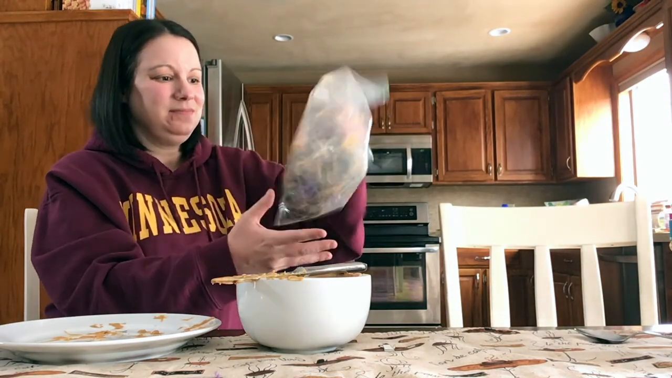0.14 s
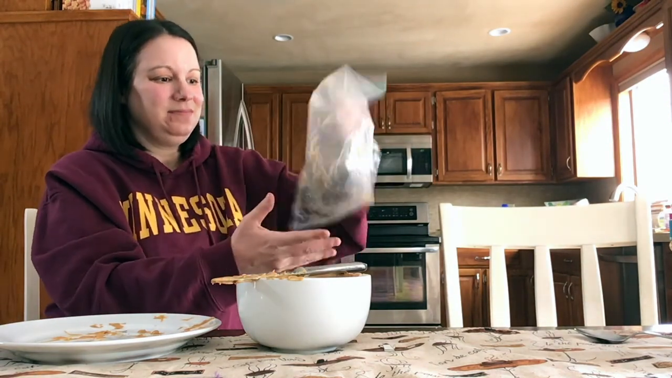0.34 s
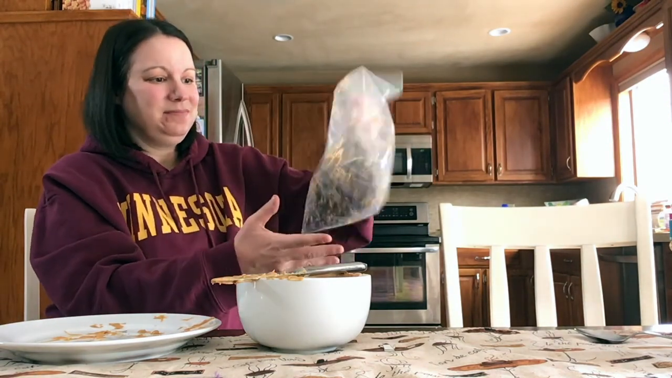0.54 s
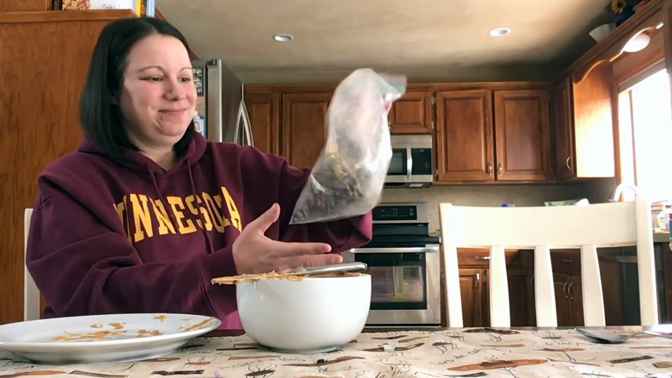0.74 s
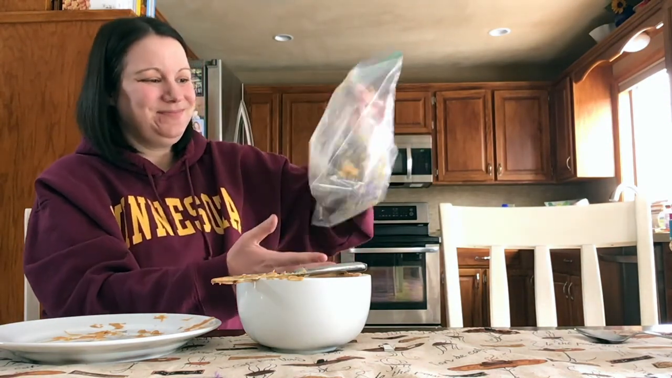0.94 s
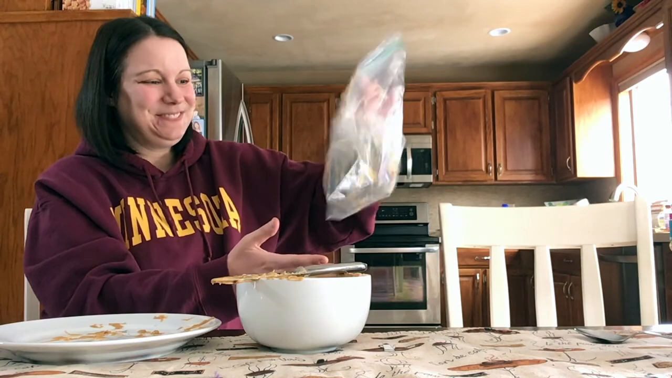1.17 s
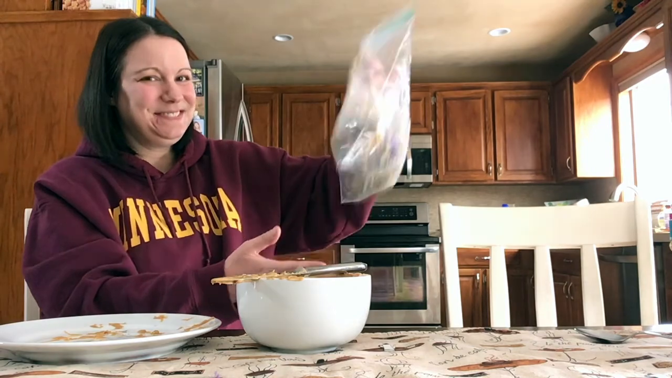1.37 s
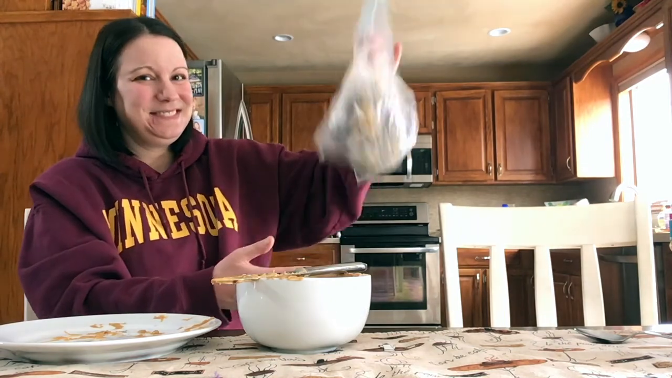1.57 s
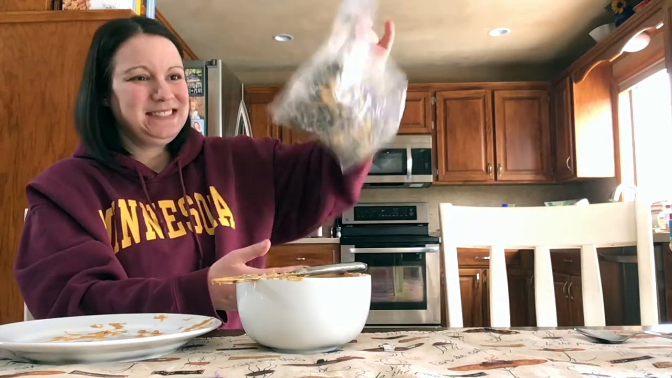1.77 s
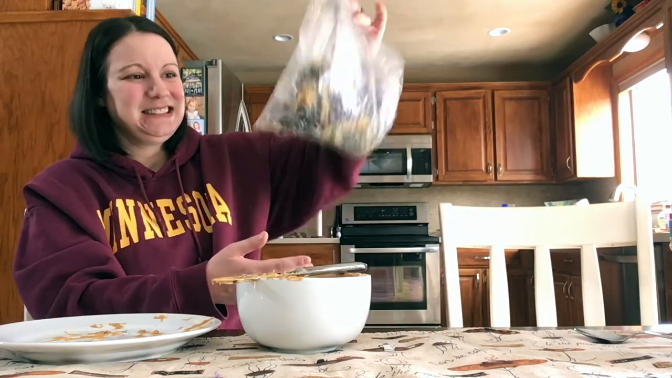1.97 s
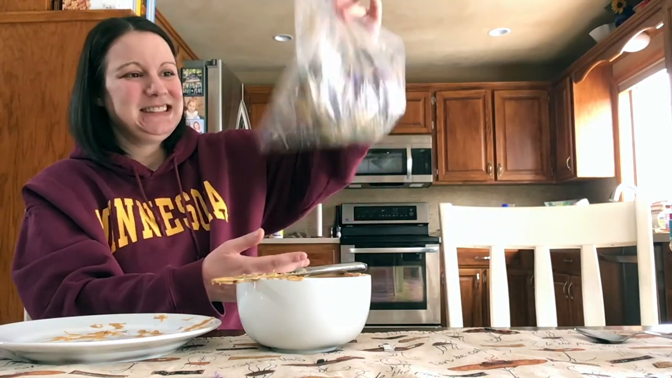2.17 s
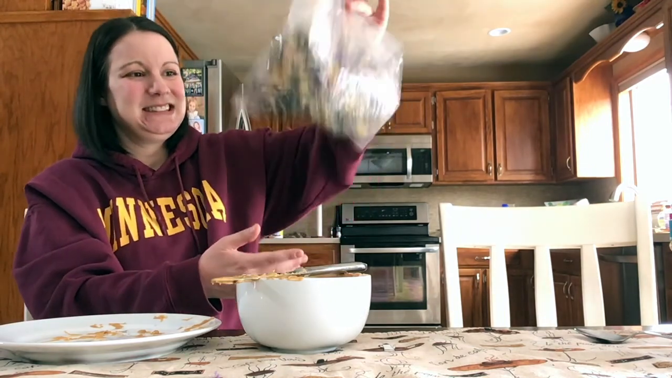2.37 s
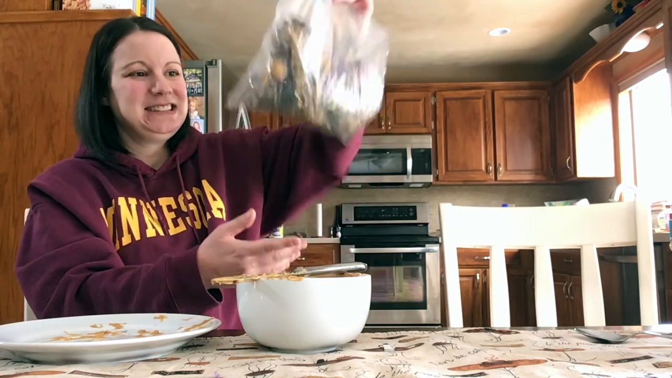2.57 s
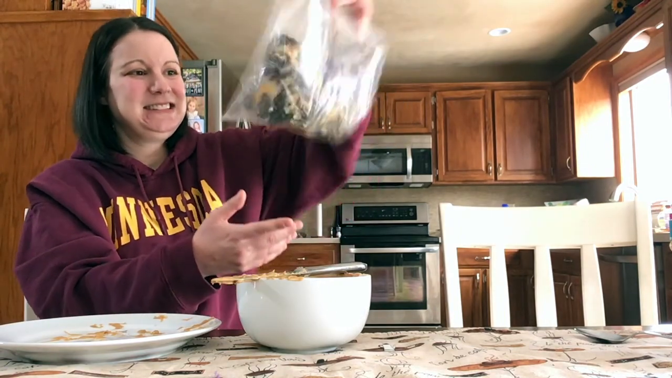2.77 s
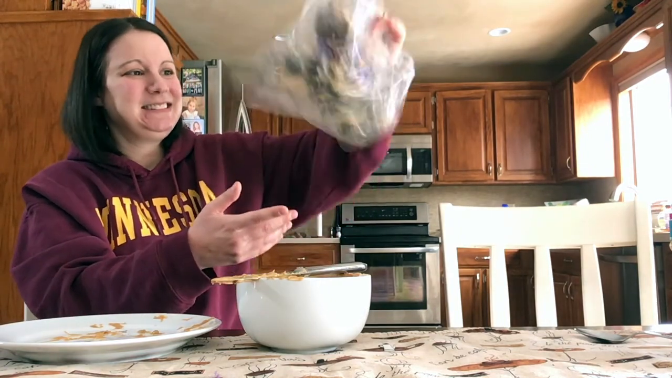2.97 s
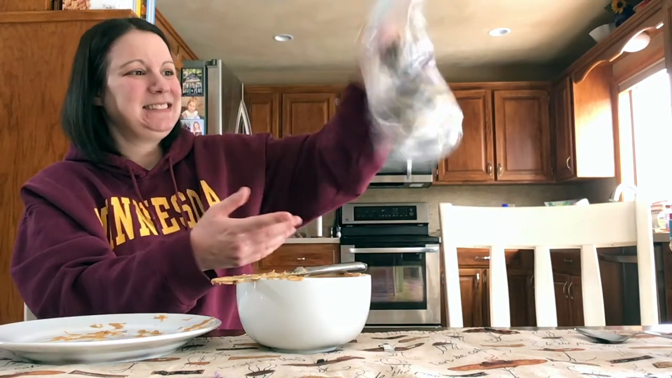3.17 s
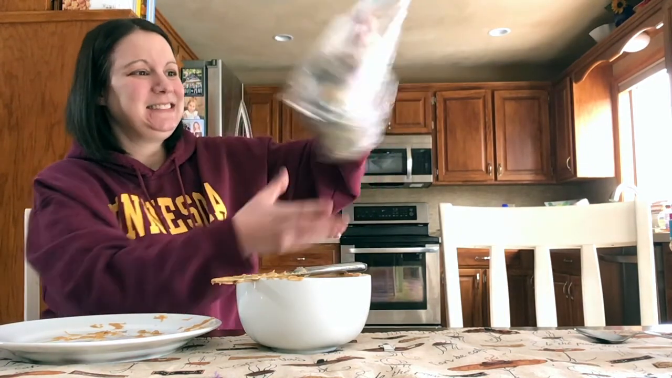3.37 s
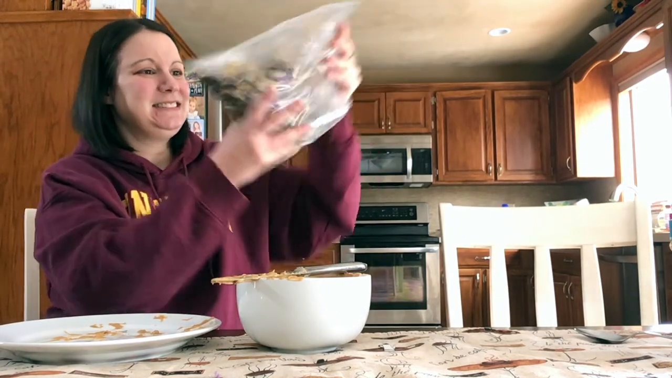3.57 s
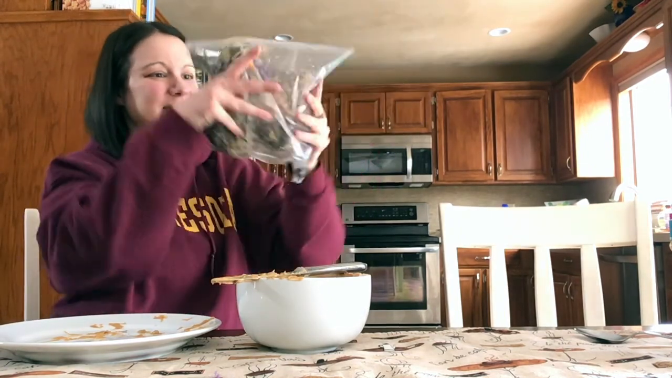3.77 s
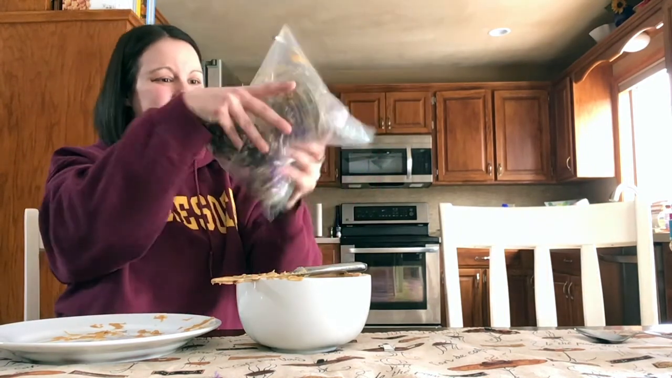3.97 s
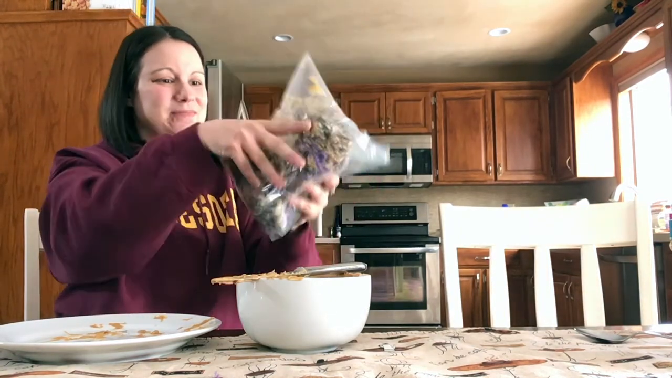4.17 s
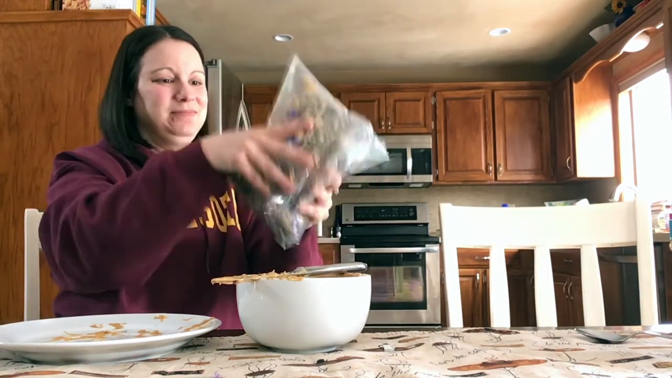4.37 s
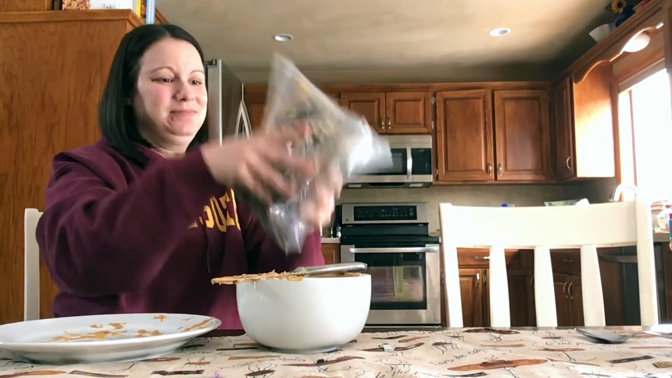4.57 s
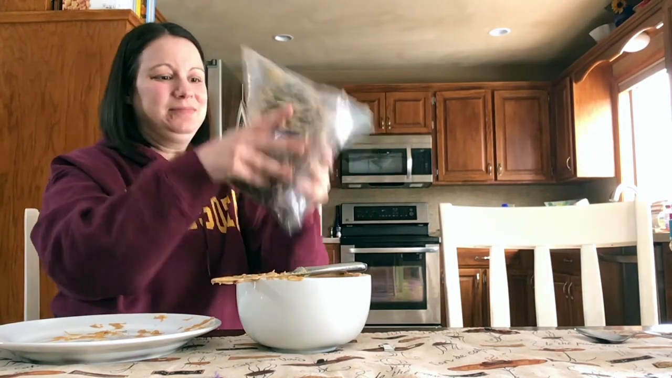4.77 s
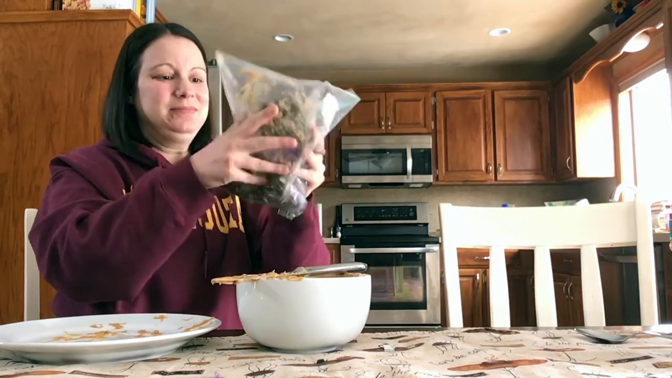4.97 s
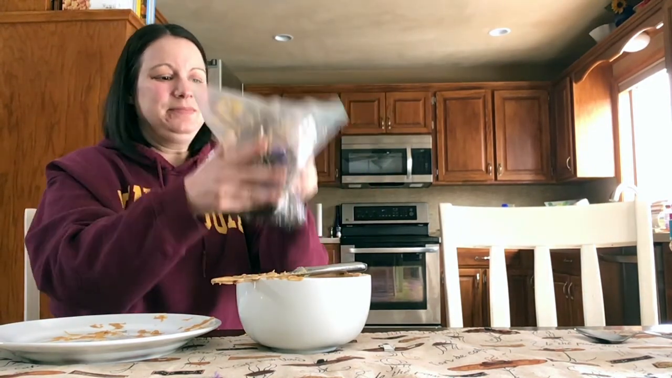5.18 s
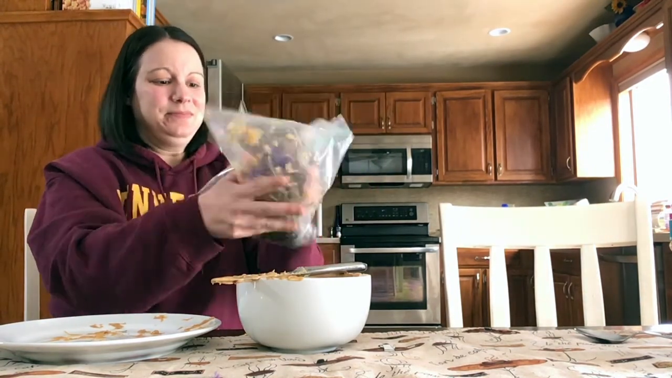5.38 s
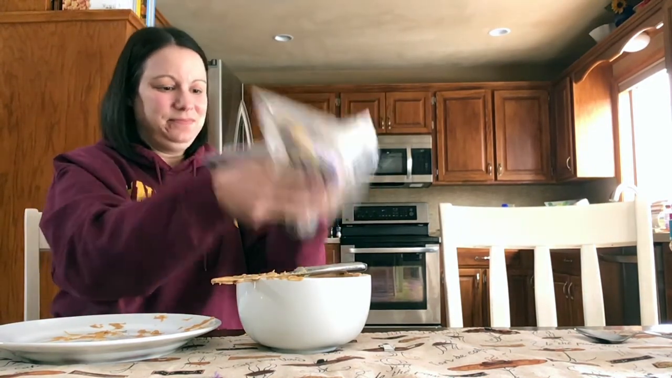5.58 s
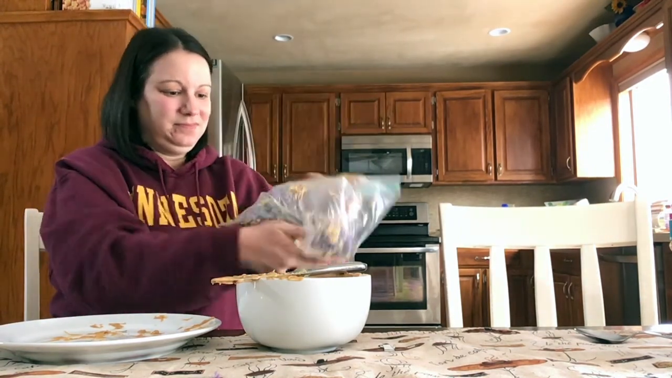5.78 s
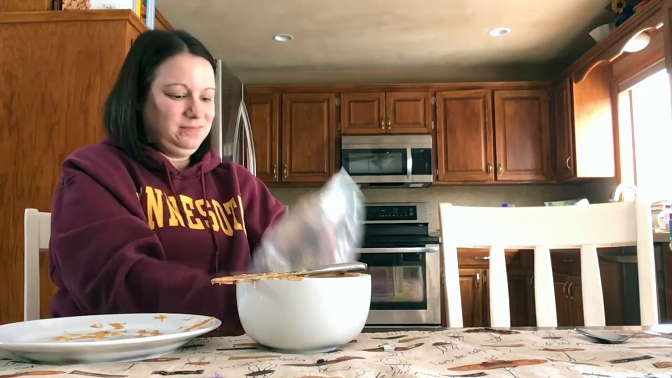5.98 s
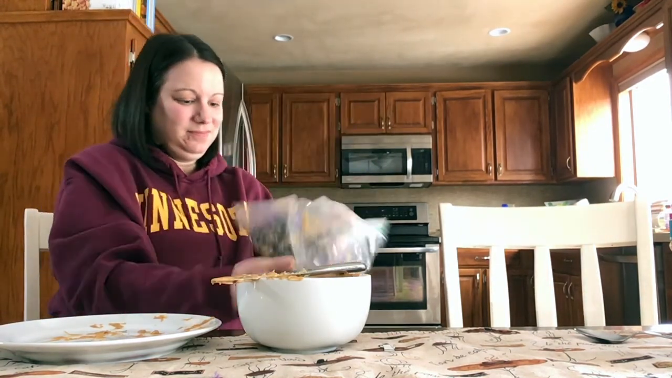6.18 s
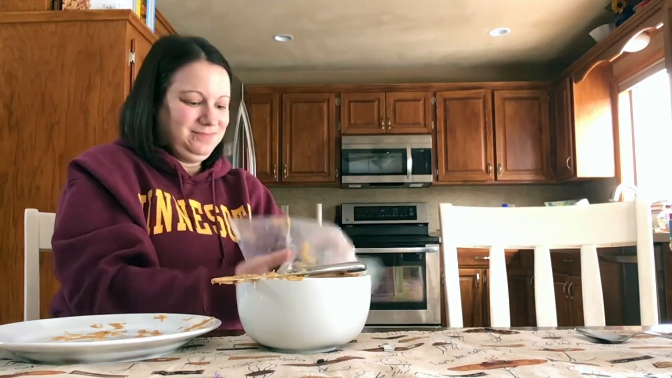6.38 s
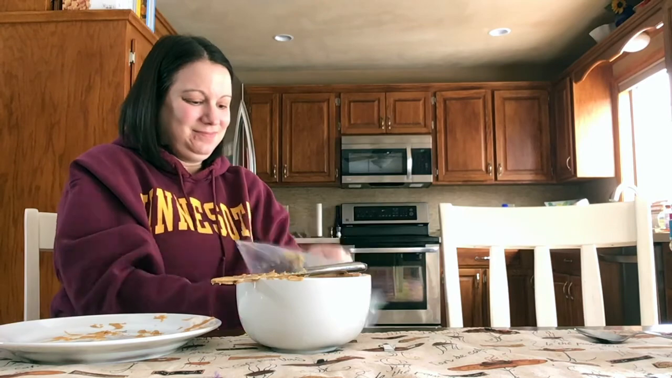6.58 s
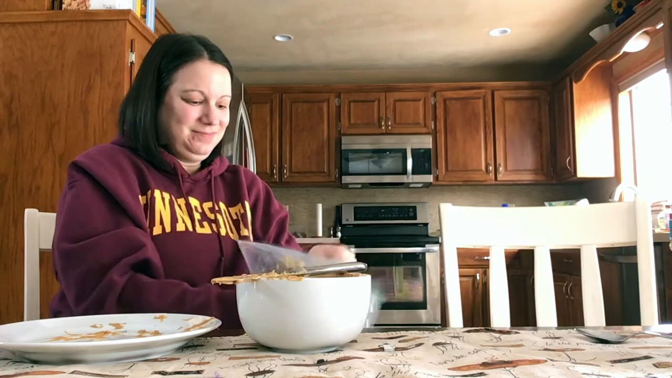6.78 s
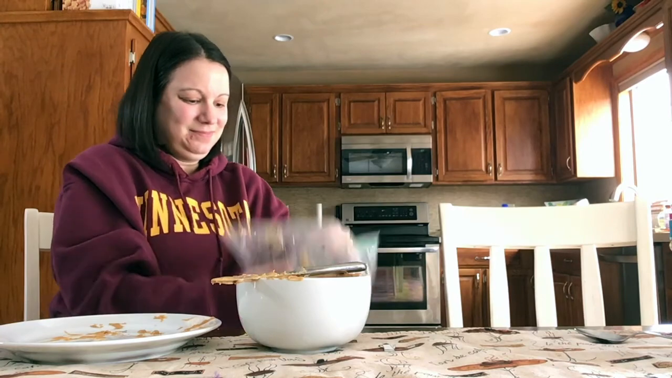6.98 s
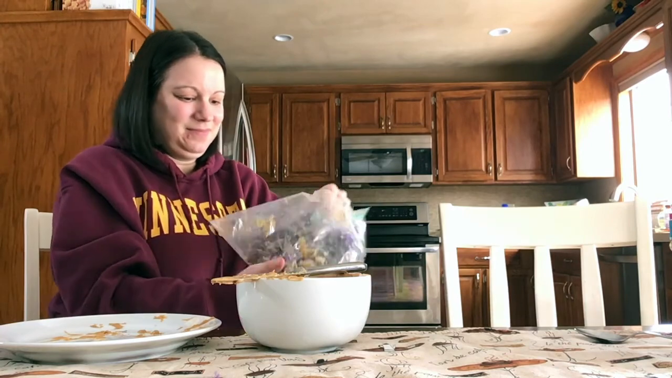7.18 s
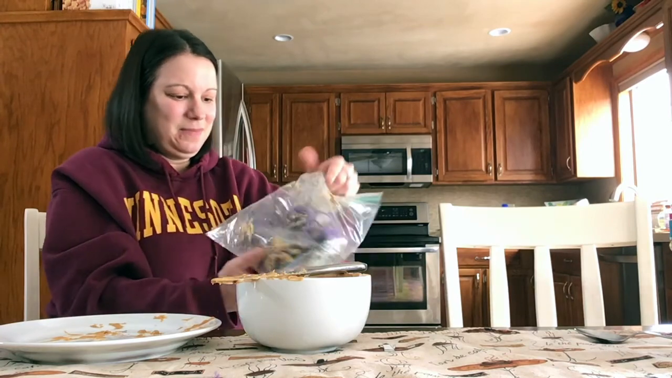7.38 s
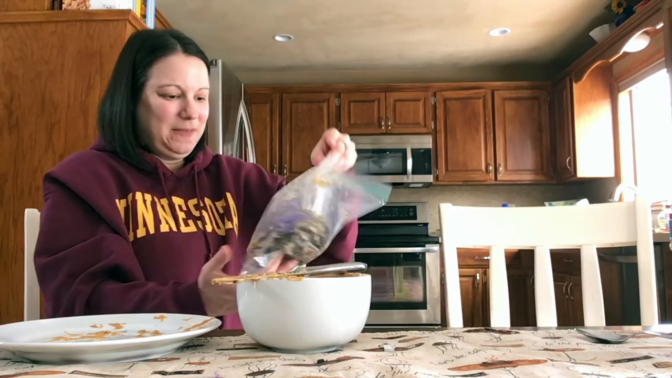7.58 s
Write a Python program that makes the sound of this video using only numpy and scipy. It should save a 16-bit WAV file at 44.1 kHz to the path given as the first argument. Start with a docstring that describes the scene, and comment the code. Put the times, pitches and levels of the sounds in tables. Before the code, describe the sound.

Seeds in a sealed plastic bag rattle in hard, quickening shakes, then softer squeezes and sharp crinkles thin out in a quiet kitchen.

```python
"""A sealed plastic bag of birdseed is shaken hard in a kitchen, then gripped, squeezed and turned over.
The strokes swell for two and a half seconds: grains of thud, kernel clack, seed rattle and film crinkle,
each ringing small resonances, with knocks on the taut film and a low sine swing of air.
From the middle on the strokes are softer and the creases snap more often, as noise cracks that ring the film;
the strokes thin out to the end. Rubbing and kitchen air, both coloured noise, lie under it all."""
import sys
import numpy as np
from scipy import signal
from scipy.io import wavfile
from scipy.ndimage import uniform_filter1d

SR = 44100
rng = np.random.default_rng(int(sys.argv[2]) if len(sys.argv) > 2 else 0)


def materialize(psi):
    """Save the field psi as 16-bit PCM at rate SR to the path in sys.argv[1].

    A 1-D psi becomes a single channel; in a 2-D psi each row is a channel.
    """
    bounded = np.clip(np.atleast_2d(psi).T, -1, 1)
    quanta = np.round(bounded * 32767).astype(np.int16)
    wavfile.write(sys.argv[1], SR, quanta)


N = 336483

# Colours of the five layers of the bag, low to high: [f/Hz, relative level/dB per Hz]
THUD = [(65, -32), (110, -12.5), (326, 2.5), (484, 0.5), (631, 2.5), (776, 1), (894, -4), (1050, -5.5),
        (1360, -55), (2310, -120)]
KERNELS = [(590, -12.5), (1000, -5), (1430, 3), (2500, -3), (3250, -15.5), (5500, -120)]
SEEDS = [(1470, -59.5), (2500, -6), (3730, -1.5), (5500, -5), (7150, -23), (12100, -120)]
FINE = [(3240, -33), (5500, -3.5), (6800, 0.5), (9800, -9.5), (12700, -66), (21600, -120)]  # the finest seeds
CRINKLE = [(5760, -11), (9800, -8), (11800, -1), (13500, -1), (14600, -3), (15800, 5)]


def bag():
    """Five kinds of impact follow each stroke; the seeds arrive in clumps that all layers share."""
    clump = bursts(90.0, fall_s=0.0082)
    creases = bursts(180.0, fall_s=0.0045)  # a faster flutter shared by the three bright layers
    thud = grains(THUD, per_s=900.0, spread_db=0.5, cycles=2.73, drift_db=3.5)
    kernels = grains(KERNELS, per_s=1800.0, spread_db=1.5, cycles=4.4, drift_db=3.5)
    seeds = grains(SEEDS, per_s=3500.0, spread_db=0.5, cycles=9.5, drift_db=4.5)
    fine = grains(FINE, per_s=4500.0, spread_db=2.0, cycles=19.0, drift_db=2.0)
    crinkle = grains(CRINKLE, per_s=7000.0, spread_db=1.5, cycles=11.0, drift_db=5.0)
    seeds *= gain_of(0.76 * creases)
    fine *= gain_of(0.48 * creases)
    crinkle *= gain_of(1.6 * creases)
    layers = np.array([thud, kernels, seeds, fine, crinkle])
    return gain_of(0.77 * clump) * (motion() * layers).sum(axis=0)


def grains(spectrum, per_s, spread_db, cycles, drift_db, count=24):
    """Impacts of uneven size, each ringing one of many small resonances that come and go as the bag bends."""
    size = gain_of(spread_db * np.minimum(rng.exponential(1, N), 5))
    size *= rng.random(N) < per_s / SR  # most samples stay silent
    size *= rng.choice([-1, 1], N)
    kind = rng.integers(0, count, N)
    out = np.zeros(N)
    for k, hz in enumerate(np.geomspace(spectrum[1][0], spectrum[-2][0], count)):
        wave = ring(hz, cycles)
        mine = np.flatnonzero(size * (kind == k))
        hits = np.zeros(N)
        hits[mine] = size[mine] * gain_of(drift_db * wander(22.0, mine))
        out += signal.oaconvolve(hits, wave * np.sqrt(hz) / np.linalg.norm(wave))[:N]
    out = coloured(out, spectrum)
    power = uniform_filter1d(out ** 2, size=2500)
    return out / np.sqrt(power + 1e-9)  # the colour drifts, the loudness holds


def wander(per_s, where):
    """Random curve with about so many turning points a second, read at the given samples."""
    at = np.cumsum(np.full(N // 128, SR / per_s))
    return np.interp(where, at, rng.standard_normal(len(at)))


def bursts(per_s, fall_s):
    """Clumps of seeds land at once and thin out: sudden rise, slower fall, mean about 0 and rms 1."""
    starts = rng.exponential(1, N) * (rng.random(N) < per_s / SR)
    level = signal.lfilter([1], [1, -np.exp(-1 / (fall_s * SR))], starts)
    level = np.log(level + 0.16 * level.mean())
    return evened(level - uniform_filter1d(level, size=700))  # the stroke sets the slow level


FINE_SHARE, FINE_DB = 0.53, 0.16  # the finest seeds follow the crinkle in part


def five(seeds_db, thud_db, kernels_db, crinkle_db):
    """Levels of the five layers, from thud up to crinkle; all but the seeds are given relative to the seeds."""
    fine_db = FINE_DB + FINE_SHARE * crinkle_db
    return seeds_db + np.array([thud_db, kernels_db, 0 * thud_db, fine_db, crinkle_db])


# The seed mass lands on the film: [t/s, rise/s, hold/s, fall/(dB per s), seed rattle level/dB,
# then relative to the rattle: thud level/dB, kernels level/dB, crinkle level/dB]
STROKES = [(0.049, 0.04, 0.03, 300, -36.5, 2.5, 1.5, -4.5), (0.1, 0.02, 0.034, 432, -28.5, 4, 5, -3),
           (0.215, 0.01, 0.0066, 780.0, -44, 1.0, -7, 10.5), (0.279, 0.012, 0.045, 175, -27.5, 4, 4.5, -1),
           (0.383, 0.018, 0.013, 350, -35.5, 8, 1, -21), (0.492, 0.029, 0.057, 400, -25, 3, 2.5, -5.5),
           (0.706, 0.015, 0.012, 204, -20.5, 0.5, 2, -5), (0.846, 0.023, 0.0033, 400, -41, -1, -7, 1),
           (0.926, 0.029, 0.017, 450.0, -18, 1, 0, -5), (1.145, 0.048, 0.02, 295, -23.0, 2, 3, -2.5),
           (1.3, 0.02, 0, 600, -40, -8, -8, -3), (1.371, 0.037, 0.011, 422, -17.5, 1.5, -1.5, -6.5),
           (1.591, 0.038, 0.015, 390.0, -18, -1, -2.5, -6), (1.714, 0.03, 0.00054, 400, -43.5, -3, -9, -2),
           (1.803, 0.02, 0.012, 271, -15, -2, -4.5, -7), (1.998, 0.022, 0.011, 375, -14.0, -2.5, -4, -5.5),
           (2.185, 0.023, 0.0095, 424, -17, -2, -3.5, -7),
           (2.389, 0.018, 0.017, 310, -14.5, -3.5, -4, -8.5),
           (2.614, 0.026, 0.0, 438, -9.5, -2.5, -4.5, -6), (2.82, 0.012, 0.034, 452, -17.0, -2, -4.5, -9),
           (3.063, 0.032, 0.028, 373, -15.5, -4.0, -3.5, -10),
           (3.276, 0.062, 0.041, 520.0, -21.5, -2.5, -3.5, -10.0),
           (3.645, 0.04, 0.12, 154, -28.5, -8.5, -6.5, -8.5),
           (3.746, 0.005, 0.059, 640.0, -30.5, -7.5, -6.5, -7), (3.89, 0.036, 0.06, 200, -35, -8, -18, -7),
           (3.955, 0.025, 0.13, 230.0, -28, -3.5, -1, -7.0),
           (4.024, 0.006, 0.026, 470.0, -25, 5.5, -1.5, -7), (4.059, 0.02, 0.026, 450, -22.5, 2, -6.5, -2),
           (4.187, 0.061, 0.1, 320.0, -28.5, -3.5, -3, -6), (4.253, 0.005, 0.057, 592, -30.5, 0, -3, -2.5),
           (4.408, 0.12, 0.0, 180.0, -28.5, -2, -5.5, -5.5),
           (4.487, 0.066, 0.019, 224, -23.5, 1.5, -0.5, -4.5),
           (4.613, 0.007, 0.093, 230.0, -30.5, 0.5, -3, -4.5),
           (4.719, 0.069, 0.025, 350.0, -24, -0.5, 0.5, -5),
           (4.856, 0.028, 0.035, 180.0, -27, -2.5, -5.5, -3.5),
           (4.944, 0.062, 0.026, 310.0, -22.5, -1.5, -3.5, -7),
           (5.11, 0.082, 0.0084, 300.0, -32, -3, -6.5, -7),
           (5.206, 0.1, 0.047, 320.0, -30.5, -2.5, -5.5, -2.5),
           (5.33, 0.036, 0.012, 330.0, -34, -5, -6, 1.5), (5.46, 0.059, 0, 196, -29.5, -2, -3.5, -4),
           (5.515, 0.018, 0, 500, -40, -10, -11, 6), (5.756, 0.048, 0.012, 330.0, -38.5, 2, 3, 6),
           (6.014, 0.056, 0.048, 110.0, -32, -3, 4, -4.5), (6.102, 0.005, 0.077, 360.0, -40, 2.0, -15, 7),
           (6.395, 0.052, 0.056, 270.0, -25.0, -4, 0.5, -3), (6.651, 0.05, 0.022, 360.0, -38, -1, -15, -4),
           (6.856, 0.016, 0.042, 370.0, -39.5, 1, 2.5, 1), (6.912, 0.02, 0.00075, 400, -38, -5, -6, 7),
           (7.036, 0.035, 0.013, 180.0, -38.5, -1.5, -5, -6),
           (7.109, 0.008, 0.024, 173, -31.0, -4.5, -2.5, -2),
           (7.355, 0.089, 0.019, 340.0, -43.5, 5, 5.5, -8), (7.45, 0.14, 0.066, 90.0, -45.5, 0.5, -2, -18),
           (7.534, 0.043, 0.017, 502, -41, -9, -14.5, 2)]
# Loose seeds keep tumbling between the strokes: [t/s, seed rattle level/dB,
# then relative to the rattle: thud level/dB, kernels level/dB, crinkle level/dB]
TUMBLE = [(0.0, -39.5, 0, -1, -2), (0.25, -42, -1.5, -3.5, -13.0), (1.05, -43, -0.5, -2.5, -16.5),
          (1.52, -42.5, -3.5, -3, -21), (1.95, -41.5, -2.5, -3.5, -17), (2.55, -43.5, -2, -2.5, -14),
          (3.22, -42.5, -3.0, -4.5, -17), (3.45, -47, 1.5, -1, -12), (3.58, -64.5, 4, -2.0, -16.0),
          (3.62, -62, 10, 2, -7.0), (3.87, -38, -12, -32, -3), (4.15, -30.0, -7, -6.5, -5.5),
          (4.6, -33.0, -13, -7.5, -6), (5.05, -54.5, 0.0, 5, -28), (5.4, -45.5, 4, -0.5, -7),
          (5.92, -49, 4, 1.0, -15), (6.3, -46, 3, -1, -10), (7.0, -44.0, 2.0, 1, -14),
          (7.3, -50, 2, 2.0, -20), (7.63, -49, -1, 1.5, 0)]
# The treble dies first: [fall as a share of the stroke's], for thud, kernels, seeds, finest seeds, crinkle
FALL_SHARE = (.75, .85, 1., 1.1, 1.25)
RISE_DB = 30  # climb within one rise time


def motion():
    """Each stroke rises, holds and falls; strokes and tumbling add in power, one gain curve a layer."""
    step = 32  # samples between points of the curves
    t = np.arange(0, N + step, step) / SR
    at = np.minimum(np.arange(len(t)) * step, N - 1)
    power = gain_of(five(*follow(TUMBLE))[:, at]) ** 2
    for s, rise_s, hold_s, fall, *levels in STROKES:
        up_db = RISE_DB * np.minimum((t - s) / max(rise_s, 1e-3), 0)
        down_db = np.outer(FALL_SHARE, fall * np.maximum(t - s - hold_s, 0))
        shape_db = np.maximum(up_db - down_db, -200)
        power += gain_of(five(*levels)[:, None] + shape_db) ** 2
    return [np.interp(np.arange(N) / SR, t, np.sqrt(p)) for p in power]


# A hard landing shoves the air, soft ones hardly do: PUSH_SLOPE is dB of push per dB of seed rattle,
# and a stroke with its rattle at HARD_DB pushes at PUSH_DB
PUSH_HZ, PUSH_DB, PUSH_SLOPE, HARD_DB, PUSH_LAG_S = 92, -31, 1.5, -13, 0.0123


def pushes():
    """The whole bag jerks at each landing in STROKES: one low swing of air."""
    out = np.zeros(N)
    for s, rise_s, hold_s, fall, seeds_db, *rest in STROKES:
        push_db = PUSH_DB + PUSH_SLOPE * (seeds_db - HARD_DB)
        add(out, s + PUSH_LAG_S, gain_of(push_db) * ring(PUSH_HZ, cycles=0.64))
    return out


# Lumps of seed knock on the taut film: [t/s, level/dB (before a 4 dB trim of the knock), f/Hz,
# low push of air relative to that level/dB]
KNOCKS = [(0.098, -22, 260, -38), (0.279, -14, 1460, -19), (0.48, -9, 630, -44), (0.54, -11.5, 683, -29),
          (0.702, -7, 1950, -32), (0.905, -25, 560, -33), (1.129, -14, 547, -19), (1.349, -16, 633, -44),
          (1.368, -5.5, 645, -15.5), (1.593, -15.5, 314, -10), (1.804, -16, 304, -46),
          (1.995, -38, 724, -55), (2.182, -8.5, 650, -11), (2.378, -10.5, 756, -39),
          (2.413, -7.5, 644, -27), (2.426, -12, 602, -29), (2.439, -26, 354, -31), (2.601, -33, 570, -41),
          (2.609, -16, 325, -28), (2.82, -16, 510, -38), (2.844, -11, 660, -12), (3.063, -10.5, 479, -35),
          (3.271, -9.5, 620, -23), (3.308, -15, 543, -29), (3.965, -9.5, 765, -43),
          (4.025, -11.5, 362, -41), (4.072, -13, 409, -40), (4.482, -6, 755, -40), (4.615, -17, 615, -36),
          (4.718, -9, 657, -42), (4.856, -23, 683, -33), (4.955, -16.5, 461, -16.5),
          (5.511, -18, 1470, -28), (5.75, -25, 1730, -18), (6.338, -16, 1550, -36), (6.855, -26, 323, -33),
          (7.102, -18.5, 1016, -13), (7.363, -16, 1960, -24), (7.516, -22, 1760, -24)]


def knocks():
    """A few seeds land together and ring the film at its pitch; a low push of displaced air goes with them."""
    out, t = np.zeros(N), np.arange(300) / SR
    for s, db, hz, push_db in KNOCKS:
        seeds = rng.standard_normal(len(t)) * np.exp(-t / 0.0013)
        knock = np.convolve(abs(seeds) ** 3, ring(hz, cycles=5.4))  # uneven pushes, all one way
        add(out, s, gain_of(db - 4.0) * knock / abs(knock).max())
        add(out, s, gain_of(db + push_db) * ring(149.0, cycles=0.93))
    return out


# Creases of the film snap over: [t/s, level/dB (before a 3 dB trim of the crack), f/Hz,
# gain of the sharp edge relative to that level/dB]
SNAPS = [(0.4955, -6, 4670, -20), (0.5268, -3, 4640, -20), (1.212, -15, 5030, -14), (1.26, -6.5, 12000, -9),
         (1.2664, -16, 9920, -20), (1.2704, -20, 11300, -20), (1.3028, -11.5, 5560, -20),
         (1.3104, -16, 11600, -15), (2.278, -19.5, 3560, -20), (2.574, -17.5, 3900, -6),
         (3.0215, -33, 3450, -15), (3.4946, -24, 3740, -7), (3.6162, -27, 5500, -20),
         (3.6353, -13, 4670, -20), (3.6551, -15, 3050, -20), (3.7386, -2.5, 4600, -8),
         (3.7983, -4.5, 6500, -15), (3.885, -10.5, 5340, -14), (3.9185, -12, 4000, -20),
         (3.9674, -7, 4330, -17), (3.995, -10, 4970, -15), (4.0266, -6, 6120, -20), (4.7316, -7, 4900, -22),
         (4.958, -7, 4400, -20), (5.0134, -19, 3350, -20), (5.076, -17, 6830, -25),
         (5.1043, -9.5, 5640, -28), (5.116, -9, 5100, -25), (5.122, -10.5, 13100, -20),
         (5.2125, -13, 12400, -20), (5.2255, -7.5, 5580, -17), (5.2834, -18, 4700, -20),
         (5.3125, -12, 6600, -25), (5.327, -8, 4560, -17), (5.3307, -7, 5650, -8), (5.4217, -16, 6630, -18),
         (5.461, -12, 5430, -20), (5.503, -12.5, 3600, -28), (5.518, -11, 12500, -15),
         (5.558, -25, 7000, -15), (5.622, -26, 13500, -15), (6.0147, -11.5, 4460, -30),
         (6.0553, -5, 13100, -20), (6.1075, -10, 8600, -17), (6.13, -11, 12000, -20),
         (6.1813, -22, 6220, -20), (6.6518, -21, 3700, -25), (6.854, -19, 3180, -15),
         (6.887, -16, 8000, -25), (6.903, -11.5, 3470, -25), (7.0494, -18, 4900, -28),
         (7.111, -16, 4300, -20), (7.455, -19, 5700, -22), (7.5073, -18.5, 5370, -28),
         (7.531, -22, 13000, -15), (7.5397, -12, 9000, -22)]


def snaps():
    """A crease flips with a broad crack; smaller cracks follow and ring the film around one pitch."""
    out, t = np.zeros(N), np.arange(800) / SR
    for s, db, hz, edge_db in SNAPS:
        flip = rng.standard_normal(len(t)) * np.exp(-t / 0.00054)
        after = rng.standard_normal(len(t)) * np.exp(-t / 0.014)
        crack = np.convolve(flip, ring(hz, cycles=1.46))
        tail = np.convolve(after, ring(hz, cycles=6.0))
        add(out, s, gain_of(db - 3) * crack / abs(crack).max())
        add(out, s, gain_of(db + edge_db) * np.diff(flip))  # the sharp edge reaches the top treble
        add(out, s, gain_of(db - 13.5) * tail / abs(tail).max())
    return out


# Low rumble of the bag on hands and table: [t/s, level/dB]
RUB = [(0.0, -46), (1.51, -56.5), (2.08, -48), (2.78, -56), (3.16, -49), (3.7, -55), (4.21, -51.5),
       (4.97, -50), (5.44, -49), (7.27, -45.5), (7.63, -50)]
# Colour of that rumble: [f/Hz, relative level/dB per Hz]
RUMBLE = [(40, -25), (70, -17), (150, -1), (260, -1.5), (500, -32.5)]


def rubbing():
    """The bag rubs on hands and table: low coloured noise whose level rides slowly."""
    return gain_of(follow(RUB)[0]) * coloured(rng.standard_normal(N), RUMBLE)


# How fast the kitchen's echo dies: [f/Hz, time to fall 60 dB/s]
KITCHEN = [(200, 0.18), (1000, 0.17), (4000, 0.12), (12000, 0.13)]


def kitchen(x):
    """Echo of the room: sparse taps of random sign, each band dying at its own speed."""
    taps = np.zeros(SR // 2)
    at = np.arange(200, len(taps) - 20, 20)
    taps[at + rng.integers(0, 20, len(at))] = rng.choice([-1.0, 1.0], len(at))
    hz, t, bands = signal.stft(taps, SR, nperseg=256)
    decay = gain_of(-60 * t / read(KITCHEN, hz)[:, None])
    tail = signal.istft(bands * decay, SR, nperseg=256)[1]
    return signal.fftconvolve(x, tail / np.linalg.norm(tail))[:N]


# Colour of the kitchen background: [f/Hz, relative level/dB per Hz]
AIR = [(120, -37), (200, -18), (537, 4), (946, -11), (2150, -7), (6690, -25), (15800, -44)]
AIR_DB = -58  # rms level


def background_air():
    """The kitchen background: steady coloured noise."""
    return gain_of(AIR_DB) * coloured(rng.standard_normal(N), AIR)


def gain_of(db):
    """Decibels to gain."""
    return 10 ** (np.asarray(db) / 20)


def evened(x):
    """Scales to rms 1."""
    return x / np.sqrt(np.mean(x ** 2) + 1e-20)


def read(points, hz):
    """Reads a table of (Hz, value) on a log-frequency axis."""
    f, value = np.transpose(points)
    return np.interp(np.log(hz + 1), np.log(f + 1), value)


def coloured(x, spectrum):
    """Causal filter, output at rms 1: the phase is the Hilbert transform of the log gain."""
    level_db = np.maximum(read(spectrum, np.fft.rfftfreq(4096, 1 / SR)), -80)
    half = np.log(gain_of(level_db))
    whole = np.r_[half, half[-2:0:-1]]  # mirrored to negative frequencies
    taps = np.fft.ifft(np.exp(np.conj(signal.hilbert(whole)))).real[:2048]
    return evened(signal.oaconvolve(x, taps)[:N])


def ring(hz, cycles):
    """A dying sine of peak 1 that falls by a factor e in so many cycles, with a softened start."""
    turns = hz * np.arange(int(6 * cycles * SR / hz) + 4) / SR
    wave = np.sin(2 * np.pi * turns) * (1 - np.exp(-2 * turns)) * np.exp(-turns / cycles)
    return wave / abs(wave).max()


def follow(rows):
    """Joins the rows of a table into one curve a column."""
    s, *columns = np.transpose(rows)
    return [np.interp(np.arange(N) / SR, s, c) for c in columns]


def add(mix, s, sound):
    """Adds a sound from second s on."""
    part = mix[round(s * SR):][:len(sound)]
    part += sound[:len(part)]


def scene():
    """The bag, its echo in the kitchen, the rubbing and the background air."""
    near = bag() + snaps() + knocks() + pushes()
    echo = gain_of(-15.5) * kitchen(near)
    return (near + echo + rubbing() + background_air())[None]


EDGE_HZ = 15900  # upper band limit


def record(dry):
    """The microphone loses the deep bass, the loudest peaks are rounded off; then the band limit."""
    thin = signal.sosfilt(signal.butter(2, 75.0, "high", fs=SR, output="sos"), dry)
    soft = 1.15 * np.tanh(thin / 1.15)
    lowpass = signal.firwin(511, EDGE_HZ, window=("kaiser", 9), fs=SR)
    return signal.oaconvolve(soft, lowpass[None], "same")


dry = scene()
out = record(dry)
materialize(out)
```